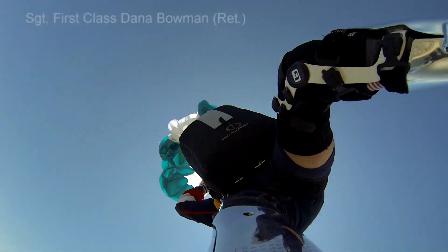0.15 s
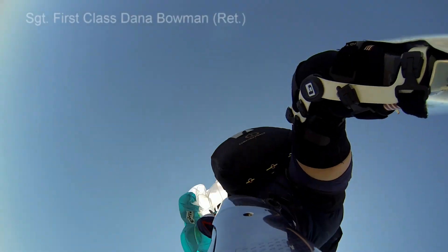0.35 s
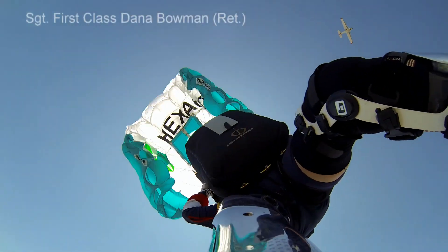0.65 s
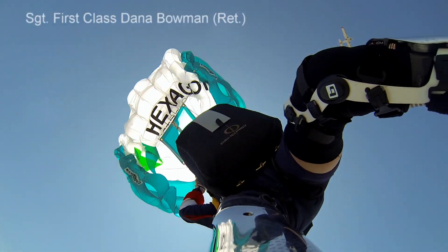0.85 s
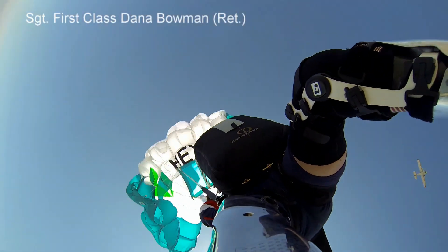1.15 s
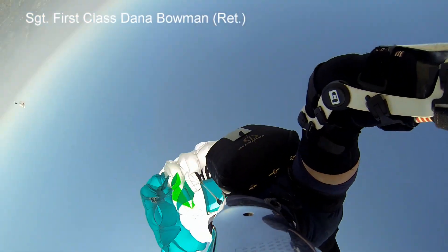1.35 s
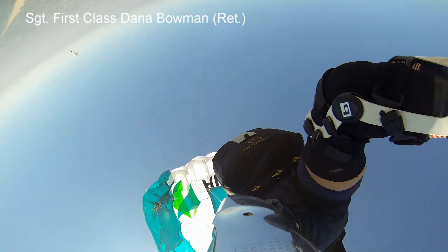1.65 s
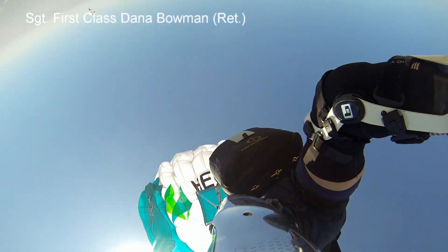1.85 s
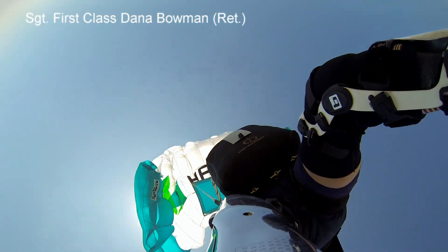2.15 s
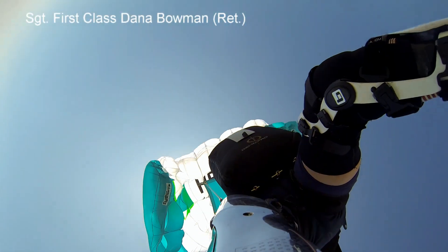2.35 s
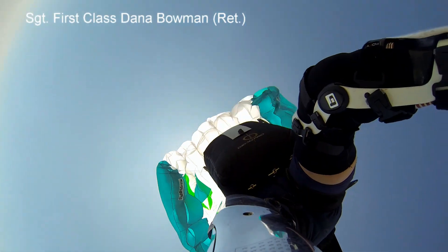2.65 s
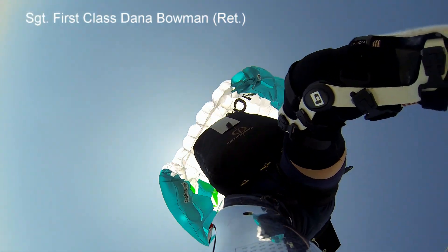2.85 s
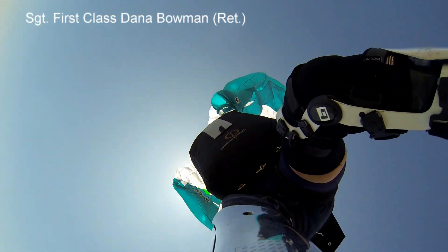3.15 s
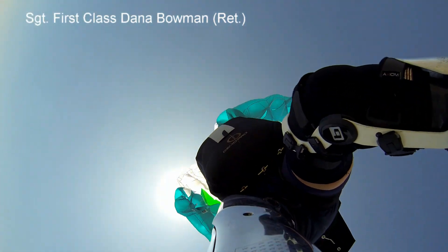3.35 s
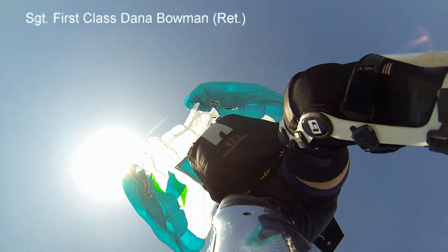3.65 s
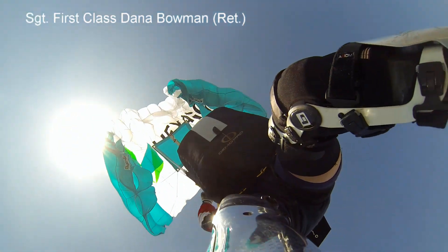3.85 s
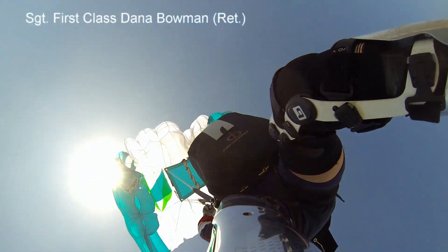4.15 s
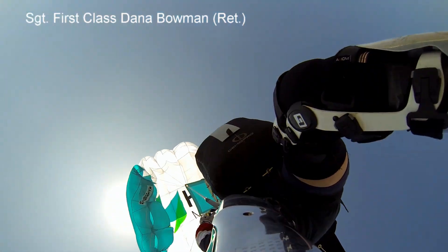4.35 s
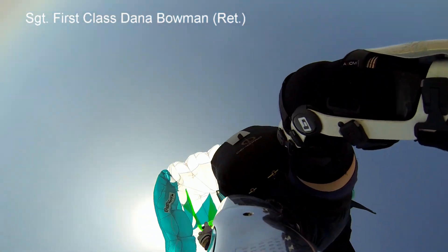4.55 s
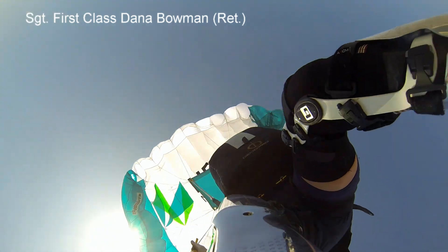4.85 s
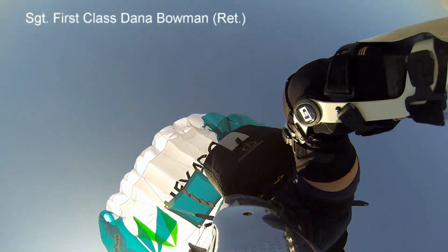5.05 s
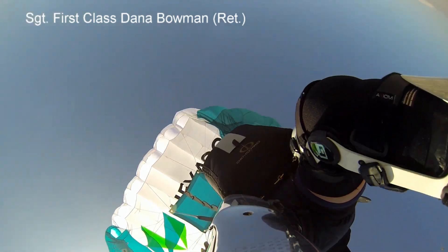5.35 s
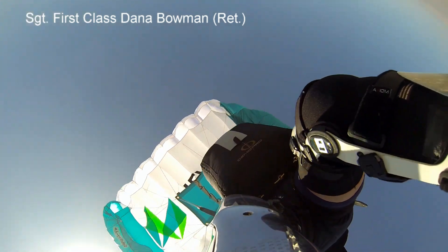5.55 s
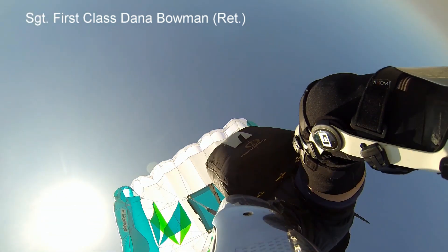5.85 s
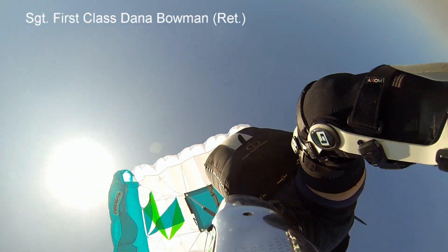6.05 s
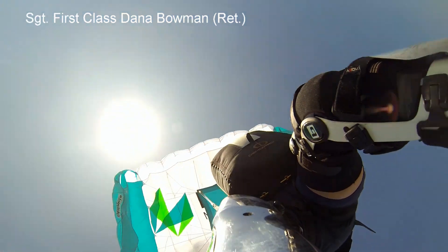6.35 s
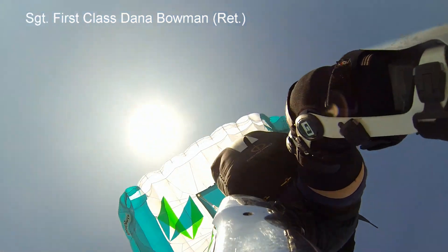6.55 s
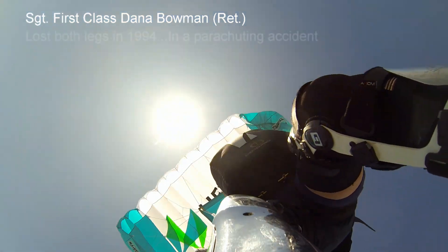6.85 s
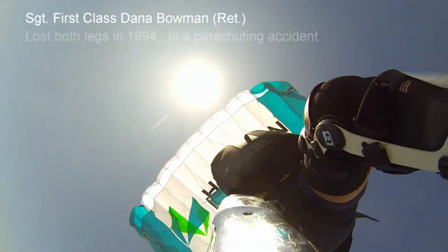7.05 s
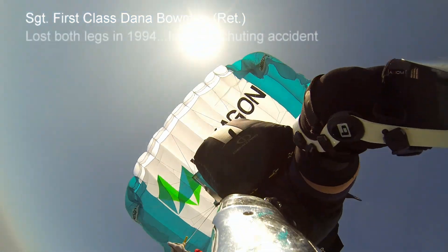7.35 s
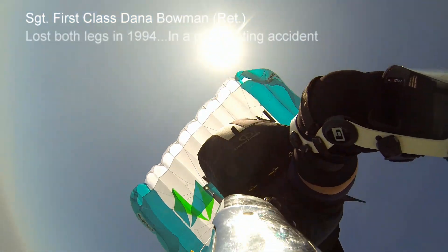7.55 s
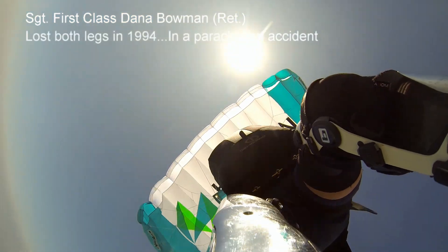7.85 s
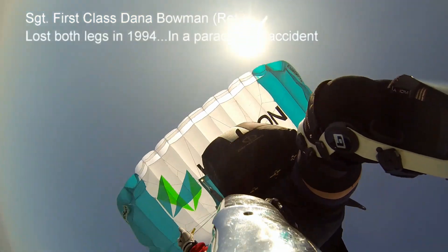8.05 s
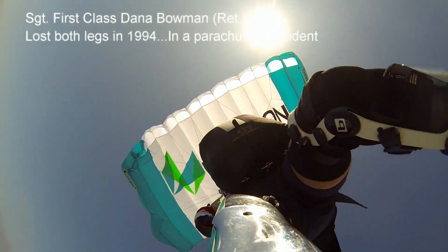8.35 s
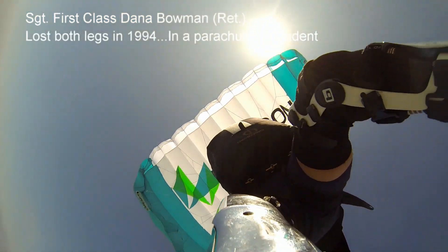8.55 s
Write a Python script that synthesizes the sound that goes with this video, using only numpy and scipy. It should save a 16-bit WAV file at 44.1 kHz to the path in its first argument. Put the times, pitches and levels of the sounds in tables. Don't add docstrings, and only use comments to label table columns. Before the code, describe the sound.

Parachute descent wind: deep thumping turbulence and rushing air, fabric hiss fading early, a faint airy whistle, and scattered dry membrane clicks.

```python
import sys
import numpy as np
from scipy import signal
from scipy.fft import rfft, irfft, next_fast_len
from scipy.io import wavfile
from scipy.ndimage import uniform_filter1d, minimum_filter1d

SR = 44100
rng = np.random.default_rng(int(sys.argv[2]) if len(sys.argv) > 2 else 0)


def output_pcm(signal):
    pcm = np.clip(np.atleast_2d(signal).T, -1, 1) * 32767
    wavfile.write(sys.argv[1], SR, np.round(pcm).astype(np.int16))


def volts_from_db(level):
    exponent = np.asarray(level, float) / 20
    return 10 ** exponent


N = 384535
PAD = next_fast_len(N, True)
BIN_HZ = np.maximum(np.arange(PAD // 2 + 1) * SR / PAD, 1)


def in_time(rows):
    s, *columns = np.transpose(rows)
    return [np.interp(np.arange(N) / SR, s, c) for c in columns]


def colour(points):
    hz, db = np.transpose(points)
    return volts_from_db(np.interp(np.log(BIN_HZ), np.log(hz), db, left=-200, right=-200))


def rms_one(x):
    return x / np.sqrt(np.mean(x ** 2) + 1e-20)


def drift(rate_hz):
    r = np.exp(-16 * np.pi * rate_hz / SR)
    noise = rng.standard_normal(N // 8 + 4002)
    slow = signal.lfilter([1], [1, -2 * r, r * r], noise)[4000:]
    return np.interp(np.arange(N) / 8, np.arange(len(slow)), rms_one(slow))


def eddies(points, shared_db, own_db, own_hz, count, tilt_db=0):
    noise = rfft(rng.standard_normal(PAD)) * colour(points)
    lowest_hz, highest_hz = points[0][0], points[-1][0]
    place = np.log(BIN_HZ / lowest_hz) / np.log(highest_hz / lowest_hz) * (count - 1)
    out = np.zeros(N)
    for k in range(count):
        share = np.cos(np.pi / 2 * np.clip(place - k, -1, 1)) ** 2
        lean_db = tilt_db * (2 * k / (count - 1) - 1)
        band = irfft(noise * share, PAD)[:N]
        out += band * volts_from_db(shared_db + lean_db + own_db * drift(own_hz))
    return rms_one(out)


def whip():
    # time in seconds, pitch in Hz, level in dB.
    whistle = [
        (0, 10100, -53.5),
        (.03, 9000, -54),
        (.06, 8600, -54),
        (.08, 8500, -93),
    ]
    hz, level_db = in_time(whistle)
    turns = np.cumsum(hz + 250 * drift(600.0)) / SR
    sounding = np.arange(N) < whistle[-1][0] * SR
    return volts_from_db(level_db + 3.0 * drift(300.0)) * np.sin(2 * np.pi * turns) * sounding


def chatter():
    # start in seconds, end in seconds, how many snaps, tick peak in dB.
    spells = [(2.72, 2.95, 4, -66), (3.54, 3.92, 4, -66), (5.19, 5.27, 3, -60), (5.83, 5.87, 2, -64),
              (6.9, 7.2, 7, -64), (7.35, 7.55, 3, -62), (7.64, 8.02, 7, -64), (8.57, 8.61, 2, -58)]
    spread_db, flip_jump, rattle_ms = 2, .2, 2.5
    rows = []
    for start, end, count, db in spells:
        for when, size, side, ring in rng.random((count, 4)):
            rows.append((start + (end - start) * when,
                         db + spread_db * (2 * size - 1),
                         flip_jump * np.round(2 * side - 1),
                         .4 + rattle_ms * ring ** 2))
    return rows


def snaps():
    # time in seconds, tick peak in dB, pressure jump (1 = full scale), rattle in ms.
    flips = [(0.7542, -41, 0, 4.7), (1.2859, -52, 0, 3.5), (1.4298, -36, 0.14, 1.2),
             (2.6847, -57, 0.19, 2.7), (2.6994, -52, -0.36, 3.4), (2.7053, -50, 0.32, 1.3),
             (2.7266, -60, -0.21, 0.5), (2.8083, -57, 0.32, 1.8), (2.8383, -56, -0.23, 0.8),
             (2.8676, -61, 0.17, 0.8), (2.8812, -58, -0.16, 1.0), (2.981, -61, 0.18, 1.7),
             (3.0282, -59, 0.19, 1.2), (3.149, -48, 0.4, 1.5), (3.4341, -55, 0.16, 1.8),
             (3.5181, -56, -0.18, 2.8), (3.5775, -53, 0.42, 1.7), (3.671, -58, 0.42, 2.0),
             (3.747, -55, -0.4, 2.7), (5.1196, -55, -0.2, 2.2), (5.3648, -56, -0.23, 1.1),
             (5.804, -56, -0.27, 0.8), (5.8977, -52, -0.18, 0.9), (6.6076, -57, 0, 4.1),
             (6.6134, -54, 0, 1.9), (6.8544, -53, -0.42, 0.9), (6.8654, -55, 0, 0.6),
             (6.8802, -54, -0.35, 0.7), (7.6242, -52, 0.23, 0.9), (7.9178, -59, 0.28, 0.7)]
    # frequency in Hz, level in dB per Hz.
    tick_points = [(1000, 8), (2600, 16), (4600, 6), (6700, -1), (8700, -2), (10800, -9), (12900, -18),
                   (15000, -32)]
    load_s, edge_s, settle_s = .003, .0007, .007
    s, tick_db, jump, rattle_ms = np.transpose(flips + chatter())
    at = np.round(s * SR).astype(int)

    t = np.arange(-900, 2400) / SR
    swing = .5 * np.tanh(t / edge_s) * 1.6 / (np.exp(-t / load_s) + np.exp(t / settle_s))
    jumps = np.zeros(N)
    jumps[at] = 1.2 * jump

    after_ms = np.arange(300) / SR * 1000
    fade = np.exp(-(after_ms / rattle_ms[:, None]) ** 2)
    rattle = .3 * rng.standard_normal((len(at), 300)) * fade
    rattle[:, 0] = 1
    ticks = np.zeros(PAD + 300)
    for i, db, row in zip(at, tick_db, rattle):
        ticks[i:i + 300] += volts_from_db(db) * row
    tick_colour = colour(tick_points)
    height = 2 * tick_colour[(BIN_HZ > 5000) & (BIN_HZ < 12000)].sum() / PAD
    ticks = irfft(rfft(ticks[:PAD]) * tick_colour / height, PAD)[:N] * volts_from_db(-1)

    def spread(marks, shape):
        return signal.fftconvolve(marks, shape)[900:N + 900]

    busy = np.clip(spread(np.abs(jumps), np.abs(swing)) * 5, 0, .7)
    low_gain = 1 - uniform_filter1d(uniform_filter1d(busy, size=60), size=60)
    return spread(jumps, swing) + ticks, low_gain


def slot_song(flutter):
    # start in seconds, length in seconds, peak in dB, lean to the upper tone in dB.
    spells = [
        (1.445, 0.72, -34.5, 0.5),
        (6.0, .42, -50, -11.5),
    ]
    # frequency in Hz, level in dB per Hz.
    slot_points = [(2500, -20), (2700, -5), (2870, -1), (3030, -2), (3190, -11), (3300, 2.5), (3410, -10),
                   (3600, -16), (4200, -35)]
    lean_db, = in_time([(s, lean) for s, _, _, lean in spells])
    song = eddies(slot_points, 0.44 * flutter, own_db=4.5, own_hz=18.0, count=2, tilt_db=lean_db)
    t = np.arange(N) / SR
    gain = np.zeros(N)
    for s, length, peak_db, _ in spells:
        lost_db = 29 * (2 * (t - s) / length - 1) ** 4
        gain += volts_from_db(peak_db - np.minimum(lost_db, 200))
    return gain * song


def lulls():
    # start in seconds, depth in dB, fall in seconds, hold in seconds, recovery in seconds.
    breaks = [(0.04, 7.5, 0.039, 0.062, .15), (0.289, 5, 0.009, 0.018, 0.12), (2.695, 8, 0.012, 0.18, 0.17),
              (3.533, 10.5, 0.027, 0.23, 0.3), (5.761, 8, 0.2, .02, 0.3), (6.434, 5, 0.063, 0.054, 0.21),
              (8.6, 3.5, 0.094, 0.023, 0.022)]
    t = np.arange(N) / SR
    return sum(np.interp(t, s + np.cumsum([0, fall, hold, back]), [0, db, db, 0])
               for s, db, fall, hold, back in breaks)


def gusts(size):
    # time in seconds, boost in dB (negative
    # = a pause), eddy size from 0 (large) to 4 (fine) or a little beyond, half length in seconds.
    gust_rows = [(.17, 8.5, 4.5, 0.11), (0.26, 4.5, 1.1, 0.055), (.56, 4.5, 2.7, .03),
                 (0.664, 7, 3.5, 0.054), (0.767, 7.5, 2.65, .03), (.87, -3.5, 2.3, 0.047),
                 (0.933, 3.5, 2.8, 0.043), (1.007, -5, 1.8, .04), (1.17, 4.5, 2, 0.039),
                 (1.335, 7.5, 2.28, 0.087), (1.426, 13, 3.55, 0.014), (2.56, 9, 3.55, 0.15),
                 (3.09, 3, 1.5, 0.055), (3.144, 17, 1.4, 0.014), (3.36, 6, 2.5, 0.16),
                 (3.517, 3, 3.5, 0.05), (3.574, 22, 2.42, 0.018), (3.661, 12, 2.5, 0.018),
                 (3.736, 15, 2.4, 0.0084), (4.093, 1, 1.4, 0.052), (5.546, 6.5, 3.6, 0.14),
                 (6.305, 4, 2.6, .1), (6.615, 10, 3.5, 0.022), (6.82, 0, 2.5, 0.044),
                 (7.09, 4.5, 2.6, 0.12), (7.3, 4, 2.4, 0.2), (7.687, -4, 2.6, 0.081),
                 (8.13, 4.5, 3.3, .08), (8.48, 5.5, 3.5, .05), (8.57, 3, 2.4, 0.052),
                 (.07, 5, 0, .04), (.53, 5.5, 0.73, 0.035), (0.667, 13, 0.36, 0.035), (0.947, -3.5, 1, 0.11),
              (1.107, 4, 0, 0.044), (1.215, 5, 0, 0.047), (1.32, -7.5, 1.13, 0.1), (1.443, 1, 0, 0.033),
              (1.506, 6, 0.7, 0.029), (1.73, 2, 0.8, 0.14), (2.087, 16, .5, 0.022), (2.18, -5, 0, 0.044),
              (2.682, 11, 0, .06), (2.838, 0.5, 0.099, .06), (3.126, 10.5, 0.33, 0.04),
              (3.243, 1.5, 0, 0.083), (3.46, -3, 0, 0.067), (3.524, 11, 0.28, 0.025), (3.571, 16, 1, .025),
              (3.663, 5, 0.5, .03), (4.2, 6, 0.38, .05), (4.758, -0.5, 0.18, 0.06), (5.815, 6.5, 1, 0.19),
              (6.56, 1, 0, .08), (6.66, 7.5, 1.3, 0.055), (6.84, 12, 0.62, 0.087), (7.178, -4, 1.3, 0.098),
              (7.623, 9, 1.2, 0.036), (7.897, 5, 0.8, 0.053), (8.256, -6.5, 0.31, 0.14)]
    reach = 0.78
    control_s = np.arange(N // 32 + 2) * 32 / SR
    gain_db = np.zeros(len(control_s))
    for s, db, own, half in gust_rows:
        rise_and_fall = np.interp(control_s, [s - half, s, s + half], [0, 1, 0])
        gain_db += db * np.exp(-((size - own) / reach) ** 2) * rise_and_fall
    return np.interp(np.arange(N) / SR, control_s, gain_db)


def flow(flogging):
    # time in seconds, strength in dB,
    # fineness in dB (high = hissier, low = more roar).
    stream = [(0, -27, 0.5), (.5, -33, 2.5), (.7, -31.5, 5), (1.1, -37, 2), (1.3, -37, -0.5),
              (1.7, -33.5, -1.5), (2.05, -35, -0.5), (2.4, -37.5, -3), (2.6, -37, -2), (3.3, -39.5, 2.5),
              (4.1, -38, -2.5), (4.5, -31, 1), (5.3, -34.5, 2), (5.65, -35, 0), (6.3, -37, 1.5),
              (7.0, -39, -1.5), (7.9, -40, -1.5), (8.72, -32.5, 0.5)]
    # time in seconds, strength in dB,
    # tightness in dB (high = small fast eddies).
    shedding = [(0, -25, -2.5), (.7, -26.5, -9.5), (1.3, -25.5, -8.5), (1.6, -27.5, -4), (2.05, -26.5, 0.5),
                (2.2, -29.5, -5), (2.6, -28, 1.5), (2.8, -26, -6), (3.4, -28, -6), (3.8, -30.5, -12.5),
                (4.08, -32, 1), (4.25, -26, 6), (5.3, -25, -0.5), (5.85, -29.5, 5), (6.4, -26, -2.5),
                (6.75, -23.5, 0.5), (7.0, -23.5, 1.5), (8.72, -27, 1.5)]
    stream_db, fine_db = in_time(stream)
    shed_db, tight_db = in_time(shedding)
    lull_db = lulls()
    swing_db = stream_db - lull_db + 36

    buffet_db = shed_db - tight_db / 2 + 0.12 * lull_db
    wake_db = shed_db + tight_db / 2 - 0.23 * lull_db
    roar_db = -26.5 + 0.99 * swing_db - 8.5 * flogging ** 2 - 0.95 * fine_db
    rush_db = stream_db - lull_db
    hiss_db = -77.5 + swing_db + 15 * flogging + 0.5 * fine_db
    levels = [buffet_db, wake_db, roar_db, rush_db, hiss_db]
    return [db + gusts(size=k) for k, db in enumerate(levels)]


def wind(low_gain):
    # time in seconds, flogging of the cloth 0-1, depth of the buffet in dB.
    opening = [(0, 0.91, -0.5), (.7, 0.79, 0.5), (1.1, 0.82, 2.5), (1.5, 0.32, -1.5), (2.2, 0.55, 3.5),
               (2.7, .05, -1), (3.5, 0.3, 1), (4.0, 0.4, 7.5), (4.3, 0.15, -5.5), (5.7, 0, -2),
               (6.0, .2, -3.5), (6.55, 0.4, 0), (6.85, 0.03, 1.5), (8.72, 0.12, -6.5)]
    # frequency in Hz, level in dB per Hz.
    buffet_points = [(12, -44.5), (22, -4.5), (43, 0.5), (75, -2.5), (110, -2), (160, -13), (260, -35)]
    wake_points = [(60, -28), (110, -6), (180, -0.5), (280, -4), (400, -9), (700, -27.5)]
    roar_points = [(180, -17), (330, -4), (480, -1), (700, -2.5), (950, -6), (1150, -11.5), (1500, -27.5),
                   (2500, -43.5)]
    rush_points = [(600, -21.5), (1100, 2.5), (1500, 1), (1950, -1), (2450, -9), (3100, -13.5), (3800, -23),
                   (4800, -34.5), (6200, -49.5), (8000, -65)]
    hiss_points = [(3500, -17.5), (5000, 6.5), (6000, 1), (7200, -3), (8100, -2), (8600, -1), (9200, -3.5),
                   (10000, -11), (10700, -9.5), (11500, -15), (12200, -26), (12900, -23.5), (15200, -36)]
    cloth_points = [(2500, -11.5), (4000, 13.5), (5500, 3), (7300, -4.5), (8100, -0.5), (8700, 4),
                    (9400, -7), (10000, -1), (10600, -2.5), (11400, -4.5), (12100, -12), (13100, -10),
                    (14000, -10.5), (15200, -21)]
    flogging, depth_db = in_time(opening)
    flogging = np.clip(flogging, 0, 1)
    buffet_db, wake_db, roar_db, rush_db, hiss_db = flow(flogging)
    gust, flutter = drift(14.0), drift(45.0)

    buffet = eddies(buffet_points, 0.22 * gust, own_db=2.73, own_hz=7.3, count=2, tilt_db=-depth_db)
    wake = eddies(wake_points, 0.75 * gust + 0.31 * flutter, own_db=0.0, own_hz=16.0, count=2)
    roar = eddies(roar_points, 0.18 * gust + 0.67 * flutter, own_db=-0.04, own_hz=37.0, count=4)
    rush = eddies(rush_points, 0.31 * gust + 0.57 * flutter, own_db=-1.0, own_hz=25.0, count=4,
                  tilt_db=16.3 * flogging)
    hiss = eddies(hiss_points, .3 * gust + .9 * flutter, own_db=-2.3, own_hz=21.0, count=3)
    cloth = eddies(cloth_points, .4 * gust + .9 * drift(28.0), own_db=1.3, own_hz=25.0, count=3)

    top = volts_from_db(3.5) * np.sqrt(1 - flogging) * hiss + volts_from_db(6.0) * np.sqrt(flogging) * cloth
    low = low_gain * (volts_from_db(buffet_db) * buffet + volts_from_db(wake_db) * wake)
    low += np.sqrt(low_gain) * volts_from_db(roar_db) * roar
    return low + volts_from_db(rush_db) * rush + volts_from_db(hiss_db) * top + slot_song(flutter)


def scene():
    snap, low_gain = snaps()
    return (wind(low_gain) + snap + whip())[None, :]


def band_limit(x):
    return signal.sosfilt(signal.butter(12, 15140, fs=SR, output="sos"), x)


def record(dry):
    ceiling, limit_s = .39, .004
    x = signal.sosfilt(signal.butter(1, 14, "high", fs=SR, output="sos"), dry)
    span = int(limit_s * SR)
    room = np.minimum(1, ceiling / (np.abs(x) + 1e-9))
    room = minimum_filter1d(room, size=2 * span)
    x = x * uniform_filter1d(uniform_filter1d(room, size=span), size=span)
    return band_limit(x)


dry = scene()
out = record(dry)
output_pcm(out)
```